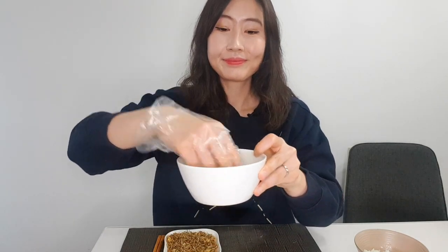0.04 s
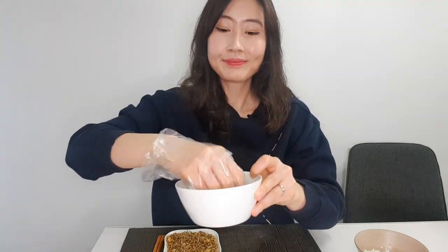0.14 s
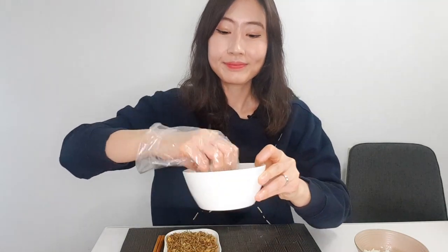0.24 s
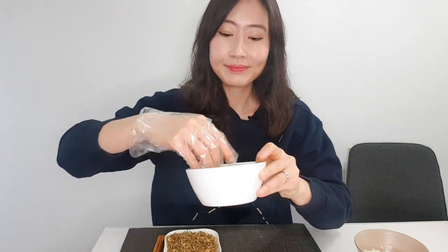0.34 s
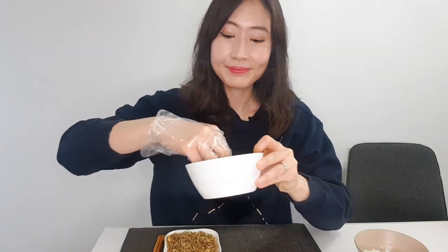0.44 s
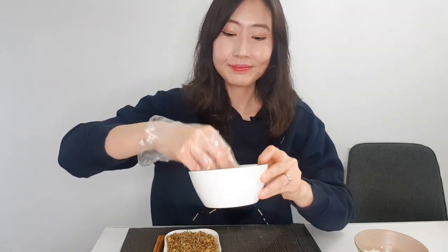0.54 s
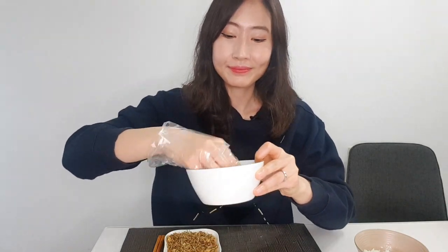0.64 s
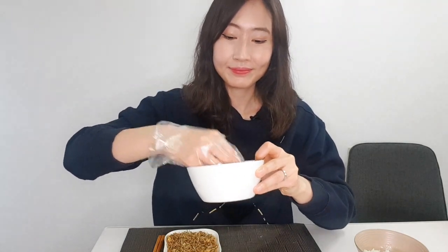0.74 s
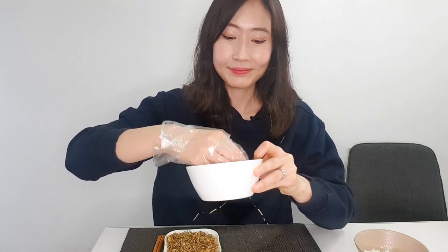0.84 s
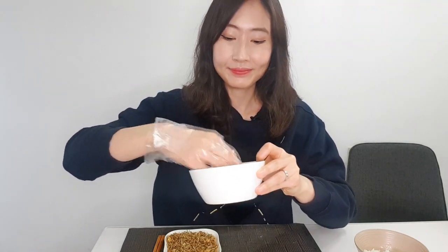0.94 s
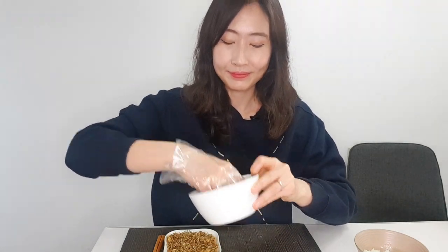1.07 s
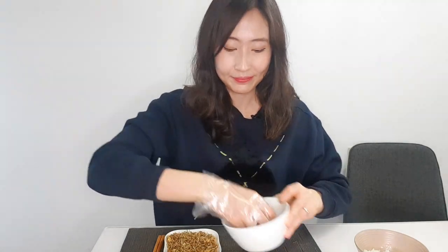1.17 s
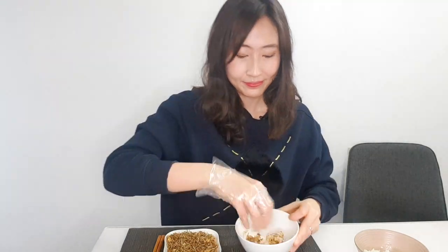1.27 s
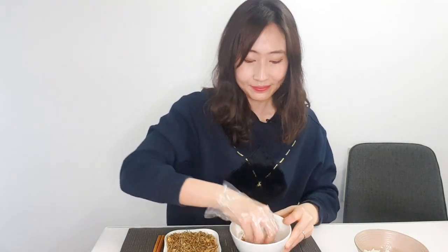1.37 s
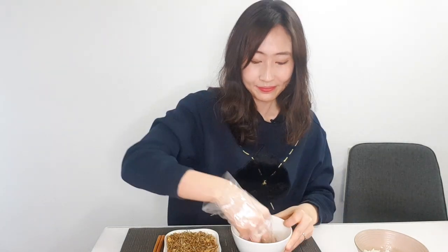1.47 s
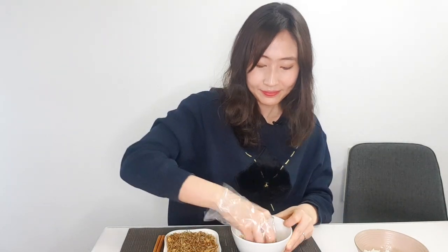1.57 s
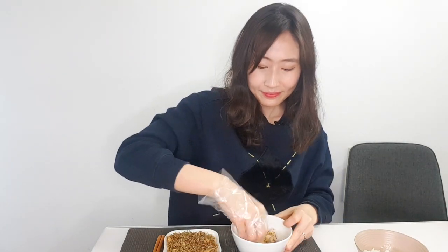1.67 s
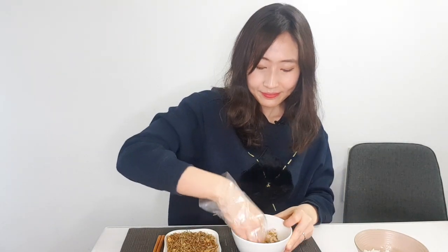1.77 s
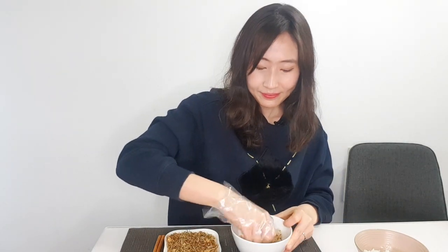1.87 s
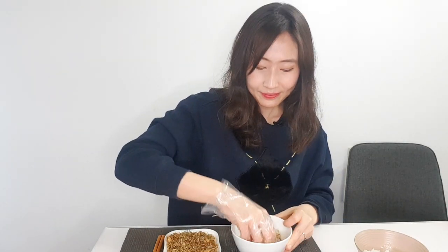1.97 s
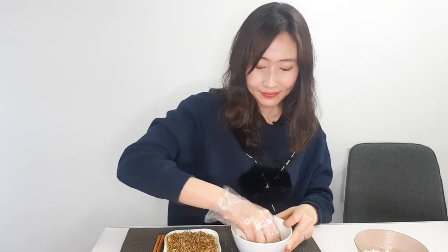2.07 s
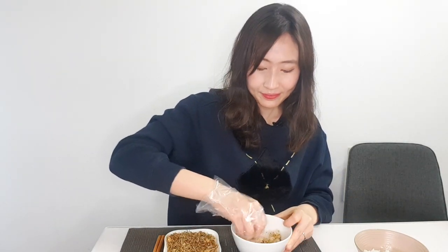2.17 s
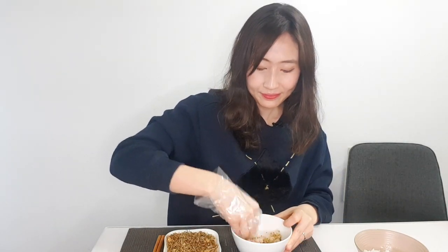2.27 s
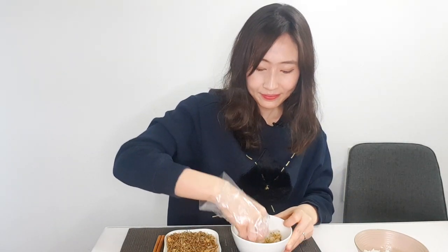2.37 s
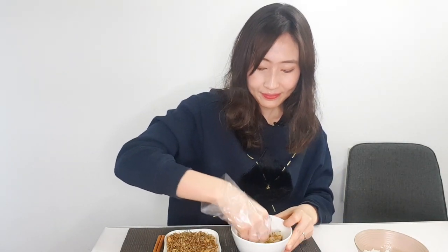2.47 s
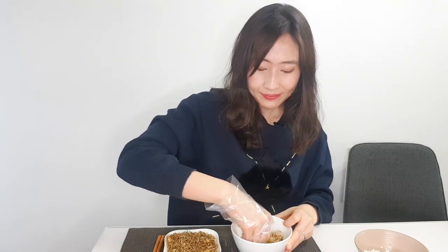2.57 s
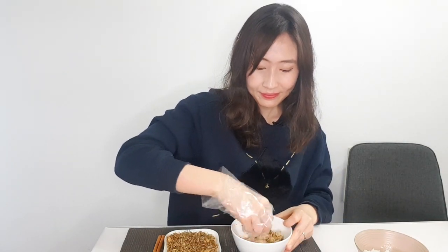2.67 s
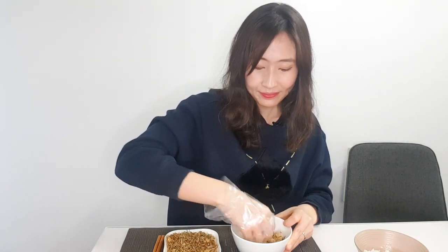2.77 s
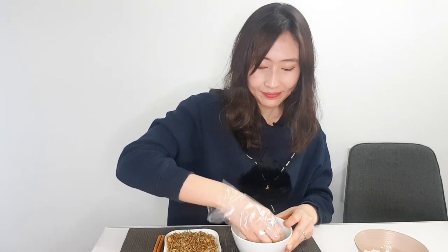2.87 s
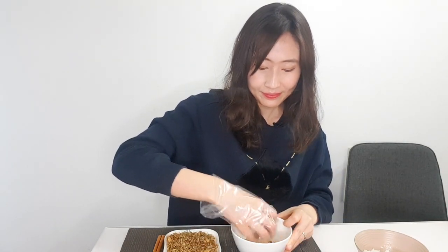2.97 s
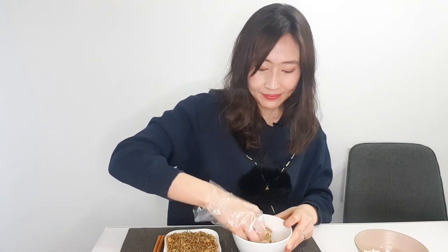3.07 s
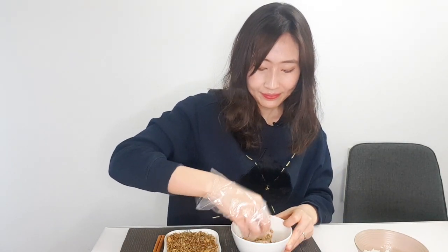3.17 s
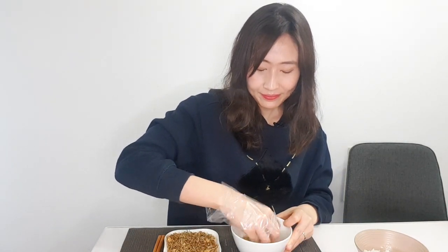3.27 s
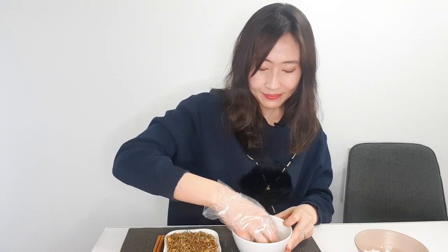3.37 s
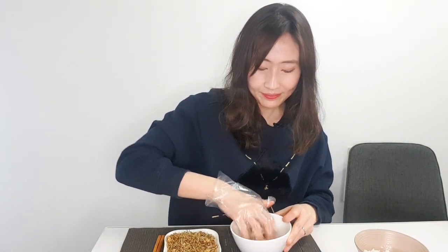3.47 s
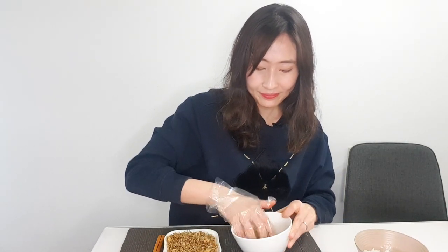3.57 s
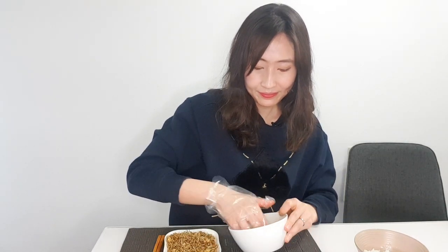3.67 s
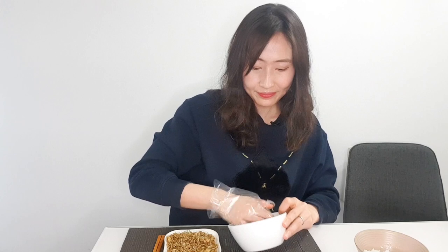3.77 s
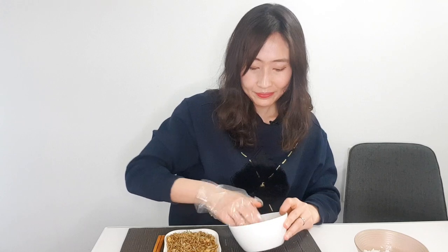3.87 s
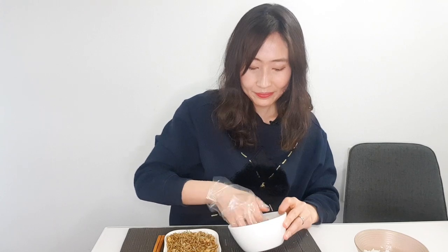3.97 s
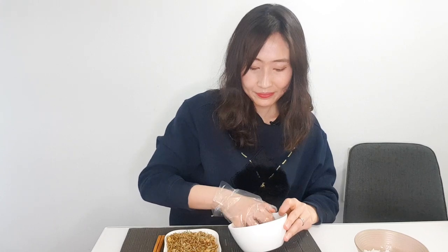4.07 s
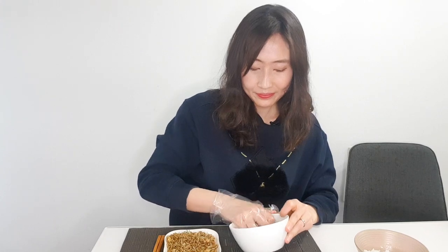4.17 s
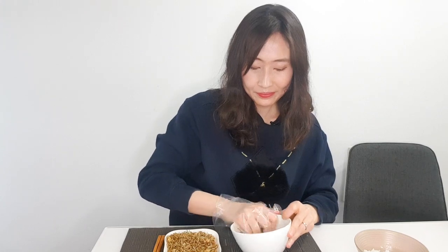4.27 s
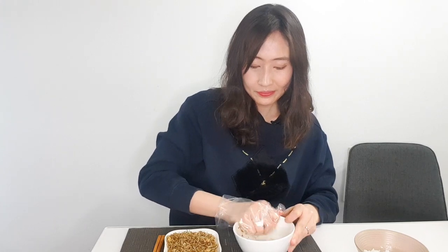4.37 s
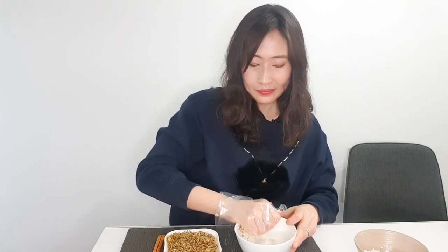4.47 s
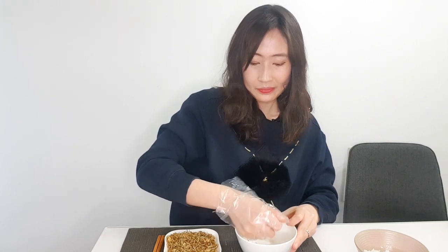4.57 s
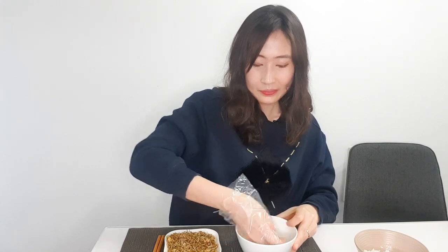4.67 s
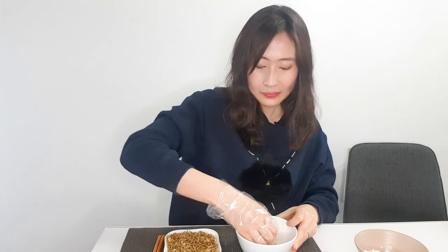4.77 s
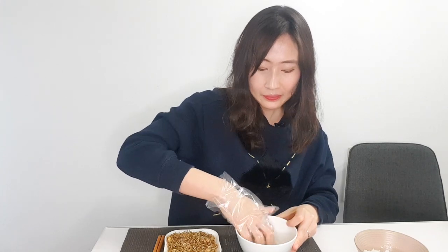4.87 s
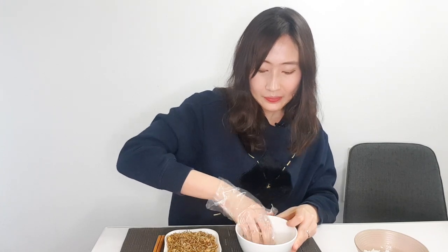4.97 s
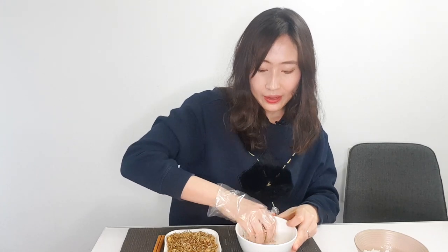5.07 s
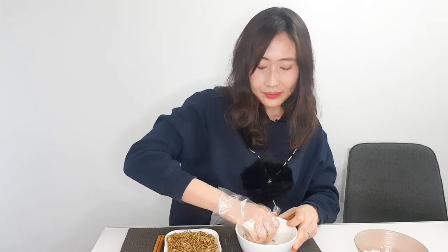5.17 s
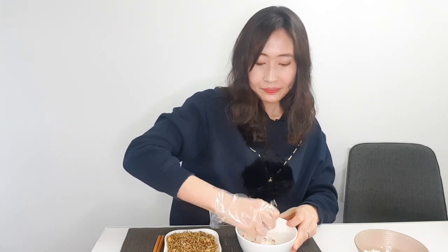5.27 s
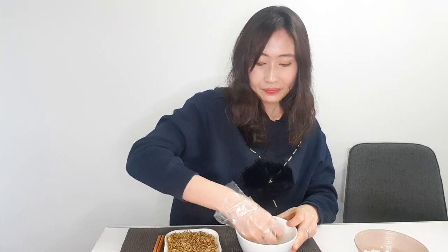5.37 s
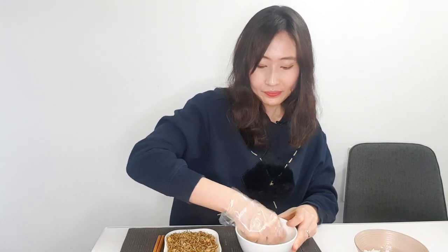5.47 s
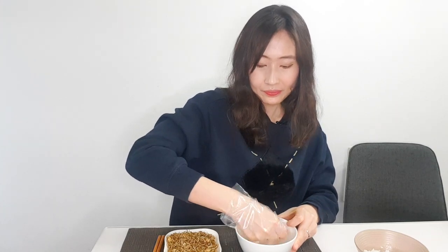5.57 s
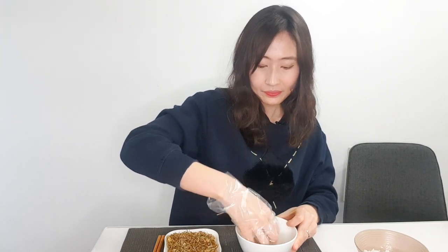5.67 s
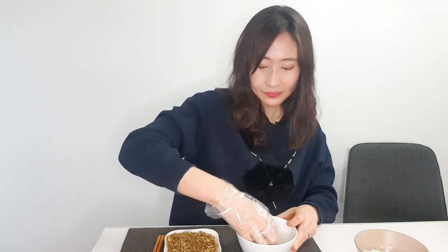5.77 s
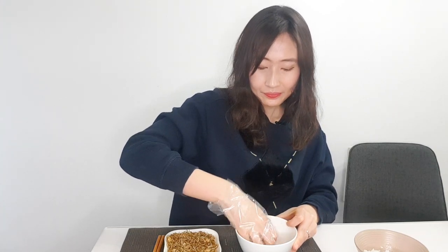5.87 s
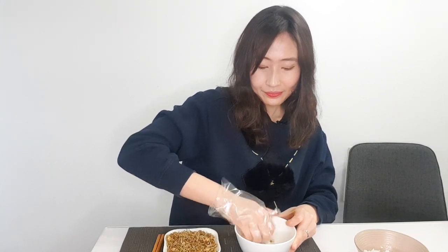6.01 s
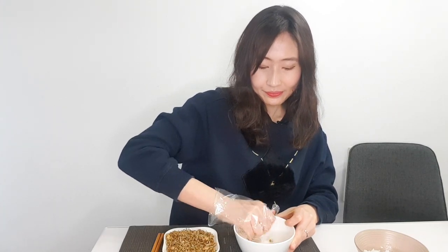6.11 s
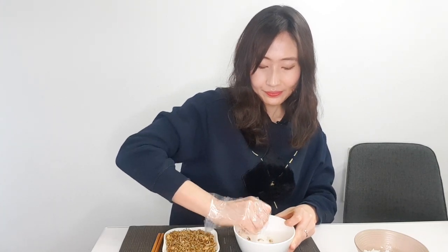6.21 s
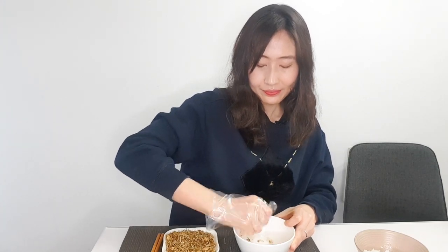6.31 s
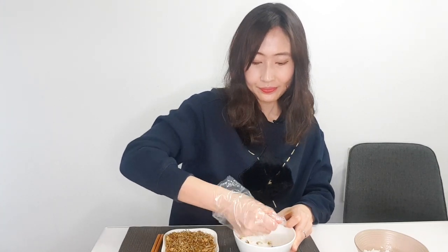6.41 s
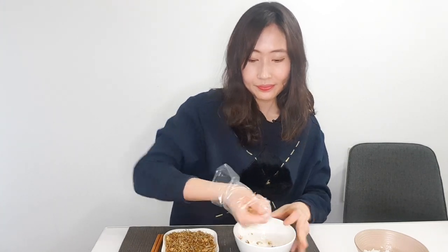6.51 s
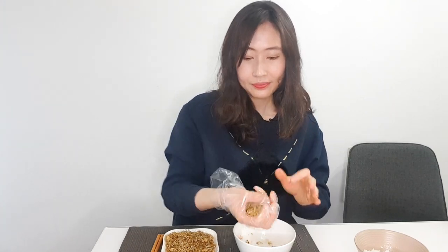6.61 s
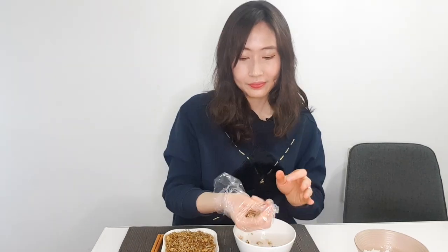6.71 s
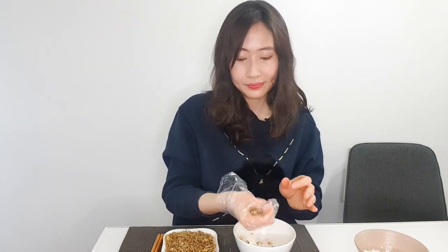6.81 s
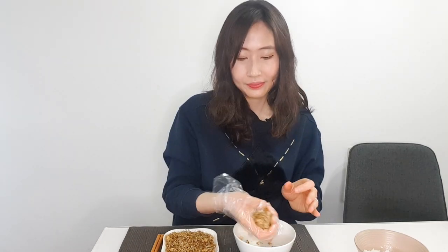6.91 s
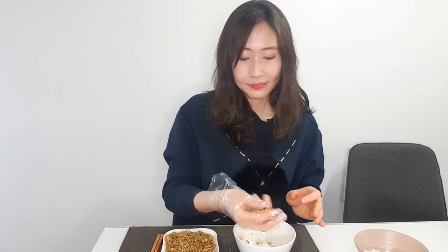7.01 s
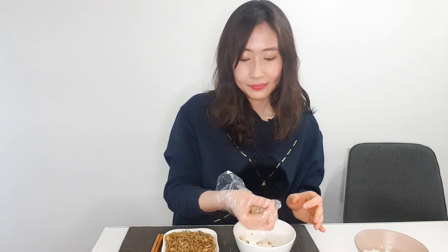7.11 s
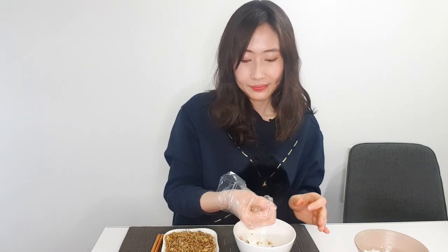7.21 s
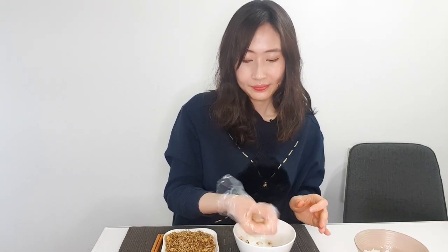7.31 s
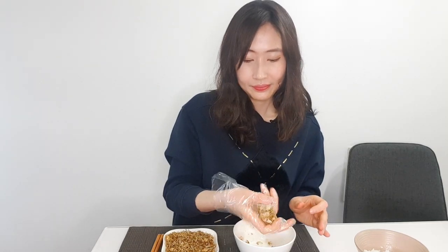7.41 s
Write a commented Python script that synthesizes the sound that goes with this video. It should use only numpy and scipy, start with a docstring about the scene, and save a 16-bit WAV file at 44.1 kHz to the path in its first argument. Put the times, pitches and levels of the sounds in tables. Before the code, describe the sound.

Crisp plastic-glove rustling over soft rice rubbing, with one hard ceramic bowl clunk and later faint knocks in a small quiet room.

```python
"""Gloved hand kneading rice

A small, faintly humming room with bare walls; one close microphone, the same in both channels.
A thin plastic glove crinkles (filtered random clicks) and snaps (short noise bursts) over a ceramic bowl.
Rice rubs along the bowl's wall (dense soft clicks) and bumps dully under the palm (low decaying sines).
The bowl, held in the air at first, is set down on the table, then rocks and knocks (ringing modes and
noise); a finger creaks off its rim (filtered pulses)."""
import sys
import numpy as np
from scipy import signal
from scipy.fft import rfft, irfft, next_fast_len
from scipy.io import wavfile
from scipy.ndimage import uniform_filter1d, map_coordinates

SR = 44100
rng = np.random.default_rng(int(sys.argv[2]) if len(sys.argv) > 2 else 0)


def master(y):
    """Save y as 16-bit WAV."""
    cut = np.clip(np.atleast_2d(y).T, -1, 1)
    pcm = np.round(cut * 32767)  # scale
    wavfile.write(sys.argv[1], SR, pcm.astype(np.int16))


N = 328545


def amp(db):
    """Decibels to gain."""
    return 10 ** (np.asarray(db) / 20)


def unit(x):
    """x at rms 1."""
    return x / np.sqrt(np.mean(x ** 2) + 1e-20)


def along(points, hz):
    """(f/Hz, value) points read on a log frequency axis."""
    f, value = np.transpose(points)
    return np.interp(np.log(hz + 1), np.log(f), value)


def curves(rows):
    """One value per sample for each column after the time."""
    s, *columns = np.transpose(rows)
    return [np.interp(np.arange(N) / SR, s, column) for column in columns]


def wobble(rate):
    """Random values, rate a second, joined by straight lines."""
    return map_coordinates(rng.standard_normal(N // 20), [np.arange(N) * rate / SR], order=1)


def coloured(x, gain_db):
    """x through a causal minimum-phase filter whose gain in dB is a function of frequency."""
    m = 2 * next_fast_len(len(x) // 2 + 2048)
    cepstrum = irfft(np.log(amp(gain_db(np.fft.rfftfreq(m, 1 / SR)))))
    # folding the cepstrum onto positive times makes the filter causal
    cepstrum[1:m // 2] *= 2
    cepstrum[m // 2 + 1:] = 0
    response = np.exp(rfft(cepstrum))
    return irfft(rfft(x, m) * response)[:len(x)]


def shaped(x, spectrum):
    """x through a filter given as (f/Hz, level/dB) points."""
    return coloured(x, lambda hz: along(spectrum, hz))


def fade(t, t60):
    """Exponential decay, 60 dB down after t60 seconds."""
    return np.exp(-np.log(1000) * t / t60)


def add(track, s, sound):
    """Mix a sound into the track at time s."""
    part = track[max(round(s * SR), 0):][:len(sound)]
    part += sound[:len(part)]


def crackle(rate, scatter_db, clump_db, clump_rate, t60):
    """Tiny buckling clicks, rate a second, in avalanches; each has its own size and its own brief rattle."""
    at = np.flatnonzero(rng.random(N) < rate / SR)
    clumps = clump_db * wobble(clump_rate)
    scatter = scatter_db * np.minimum(rng.standard_normal(N), 2.5)  # no click stands out too far
    sizes = amp(scatter + clumps)[at]
    k = np.arange(SR // 700)
    clicks = sizes[:, None] * rng.standard_normal((len(at), len(k))) * fade(k / SR, t60)
    return np.bincount((at[:, None] + k).ravel(), clicks.ravel(), N + len(k))[:N]


def even(x):
    """x at nearly the same mean strength from moment to moment, single clicks kept."""
    power = uniform_filter1d(uniform_filter1d(x ** 2, size=1700), size=700)
    return x / np.sqrt(np.abs(power) + 1e-12)


def stroke(length, attack, sag_db, t60):
    """Strength of one hand movement: it swells, sags while it lasts, then dies away."""
    age = np.arange(int((length + t60) * SR)) / SR
    rise = np.sin(np.pi / 2 * np.minimum(age / attack, 1)) ** 2
    sag = amp(sag_db * (.5 - np.minimum(age / length, 1)))
    return rise * sag * fade(np.maximum(age - length, 0), t60)


def effort(strokes, idle_db, attack, sag_db, t60):
    """Gain over time of (start, length, dB) movements, added in power to the idle level."""
    power = np.full(N, amp(idle_db) ** 2)
    for start, length, db in strokes:
        add(power, start, (amp(db) * stroke(length, attack, sag_db, t60)) ** 2)
    return np.sqrt(power)


# colour of the room's drone: [f/Hz, relative level/dB]
HUM_SPECTRUM = [(20, -27), (40, -32), (55, -13), (85, -21.5), (118, -0.5), (150, 1.5), (200, -8.5),
                (290, -13.5), (400, -15.5), (1000, -32), (3000, -14), (8000, -49.5), (16000, -42)]


def hum(level_db=-69, drift_db=2.88):
    """The room drones faintly in its low resonances: filtered noise that swells and sinks."""
    swell_db, = curves([(0, 1.452), (1.3, 1.228), (2, -1.195), (4, 1.83), (7.45, -1.945)])
    drone = unit(shaped(rng.standard_normal(N), HUM_SPECTRUM))
    return amp(level_db + swell_db + drift_db * wobble(12)) * drone


# how long the room rings on: [f/Hz, t60/s]
ROOM_DECAY = [(150, 0.252), (1000, 0.2056), (4000, 0.087), (14000, 0.068)]


def room(x, wet_db):
    """x with the short answer of bare walls: noise dying at a different speed in each band."""
    hz, t, bands = signal.stft(rng.standard_normal(SR // 2), SR, nperseg=256)
    tail = signal.istft(bands * fade(t, along(ROOM_DECAY, hz)[:, None]), SR, nperseg=256)[1]
    tail = np.pad(tail / np.linalg.norm(tail), (SR // 300, 0))  # walls answer after about 3 ms
    return x + amp(wet_db) * signal.fftconvolve(x, tail)[:N]


# the palm presses into the bowl: [t/s, level/dB of a 0 dB mode]
PALM_PRESSES = [(0.201, -57), (1.722, -55.5), (1.894, -52.5), (2.15, -57), (2.44, -59.5), (2.756, -55.5),
                (2.83, -57.5), (3.119, -59), (3.719, -57.5), (3.942, -55.5), (5.082, -56), (5.74, -59),
                (6.49, -58.5), (7.048, -58)]


def presses(t60=0.197, rise_s=0.00614):
    """A push of the palm into the rice gives a dull, low bump of three decaying sines."""
    out, t = np.zeros(N), np.arange(SR // 3) / SR
    for s, db in PALM_PRESSES:
        sway = sum(amp(mode_db) * np.sin(2 * np.pi * (hz * t + rng.random()))
                   for hz, mode_db in [(120, -1.0), (149, 1), (195, -3.5)])
        add(out, s, amp(db) * sway * fade(t, t60) * (1 - np.exp(-t / rise_s)))
    return out


# a fingertip lets go of the glaze in jerks: [t/s, dry peak level/dB, treble edge f/Hz]
FINGER_SLIPS = [(6.6514, -34.5, 2406), (6.6587, -35, 2869), (6.6624, -33, 3287), (6.6671, -41.5, 3275),
                (6.6716, -45, 3072)]


def creak(ring_db=-26, ring_t60=0.0134):
    """Each slip is one dry, rounded pulse with a trace of ring."""
    out, t = np.zeros(N), np.arange(SR // 25) / SR
    for s, db, edge_hz in FINGER_SLIPS:
        jerk = (t == 0) + amp(ring_db) * rng.standard_normal(len(t)) * fade(t, ring_t60)

        def rounding(f):
            treble_cut = 1 + np.minimum(f / edge_hz, 2) ** 12  # no further loss above twice the edge
            bass_cut = 1 + (200 / (f + 10)) ** 4
            return -10 * np.log10(treble_cut * bass_cut)

        pulse = coloured(jerk, rounding)
        add(out, s, amp(db) * pulse / np.abs(pulse).max())
    return out


# the bowl meets the table: [t/s, blow level/dB, contact hardness f/Hz, table thump level/dB,
# share of the full ring length]
BOWL_KNOCKS = [(1.396, -20, 2200, -0.5, 0.74), (1.437, -25.5, 1211, 0, 0.321),
               (1.894, -40.5, 3012, -7.5, 0.907), (2.262, -52.5, 2001, -10.5, 0.69),
               (2.570, -49.5, 2600, -7.5, 0.587), (2.632, -52, 2388, -15.5, 0.503),
               (2.757, -41.5, 2797, -4, 0.983), (3.416, -46.5, 1101, 5.5, 0.82),
               (5.600, -39.5, 1080, 4.5, 0.822)]
# bowl on table, the short modes are the clack of its foot: [f/Hz, relative level/dB, free t60/s]
BOWL_MODES = [(195, -7.5, 0.092), (316.3, -3.5, 0.099), (368.9, -1, 0.1013), (629.7, -5, 0.1444),
              (730.7, -0.5, 0.0565), (735.5, -5, 0.201), (935.2, -22.5, 0.245), (1002.3, -9.5, 0.425),
              (1135, -6, 0.127), (1316.7, 5.5, 0.065), (1445.4, 4, 0.157), (1475, 4, 0.078),
              (1620.6, 5.5, 0.0445), (1676.7, 4, 0.102), (1898, 14.5, 0.0267), (1952, -8, 0.14),
              (2157, -11.5, 0.079), (2200, 0.5, 0.059), (2506, -31, .05), (2640, -31.5, .1),
              (2936, 2, 0.065), (3260, -15.5, .08), (4320, -31.5, 0.1)]
# colour of the struck table: [f/Hz, relative level/dB per Hz]
TABLE_SPECTRUM = [(40, -10), (80, -25.5), (110, -6), (170, -2), (340, -3), (450, -4.5), (680, 4.5),
                  (950, 3.5), (1500, -2.5), (2000, 1.5), (2600, -1.5), (3500, -6), (6000, -7), (15000, -11)]


def bowl(clack_db=-5, clack_t60=0.0966, rattle_db=-12, rattle_t60=0.33, thump_hz=750):
    """Each knock rings bowl and table; a soft contact loses the treble, a flat one thumps, the hand damps."""
    out, t = np.zeros(N), np.arange(SR // 2) / SR
    hz, mode_db, t60 = np.transpose(BOWL_MODES)[:, :, None]  # one row per mode
    for s, db, hard_hz, thump_db, free in BOWL_KNOCKS:
        age = t / max(free, .1)  # a damped ring ages faster
        strengths = amp(mode_db + rng.standard_normal(hz.shape))  # no two blows land alike
        phases = .5 * rng.random(hz.shape)  # all modes start within half a cycle
        modes = strengths * np.sin(2 * np.pi * (hz * t + phases)) * fade(age, t60)
        ring = np.sum(modes, axis=0) / np.linalg.norm(strengths)
        dying = amp(clack_db) * fade(age, clack_t60) + amp(rattle_db) * fade(age, rattle_t60)
        force = amp(0.0576 * (db - BOWL_KNOCKS[0][1]))  # a light tap shakes the table a little less
        # noise stands for the table's many crowded modes
        clack = force * dying * unit(shaped(rng.standard_normal(len(t)), TABLE_SPECTRUM))

        def contact(f):
            thump = thump_db / (1 + (f / thump_hz) ** 4)
            treble_cut = 1 + (f / hard_hz) ** 4
            bass_cut = 1 + (110 / (f + 10)) ** 4
            return thump - 10 * np.log10(treble_cut * bass_cut)

        onset = 1 - np.exp(-t / 0.0007)
        add(out, s, amp(db) * coloured((2.52 * ring + clack) * onset, contact))
    return out


# strokes that push rice along the bowl's wall: [start t/s, length t/s, level/dB before the rice gain]
RICE_SMEARS = [(0.0, 0.0846, -68), (.58, 0.0435, -63.5), (.795, 0.0336, -58), (.98, 0.39, -70),
               (1.57, 0.2186, -61.5), (1.93, 0.12, -71.5), (2.34, 0.1507, -65), (2.55, 0.0579, -74.5),
               (2.86, 0.0904, -63.5), (3.05, 0.17, -65), (3.39, 0.1884, -64), (3.67, 0.2784, -67),
               (4.35, 0.0826, -67.5), (4.42, 0.08, -62), (4.94, 0.202, -62.5), (5.33, 0.0887, -74),
               (5.84, 0.119, -63), (6.32, 0.0662, -64.5), (6.92, 0.18, -66), (7.34, .06, -64.5)]
# colour of the hollow rub: [f/Hz, relative level/dB]
RICE_SPECTRUM = [(100, -32), (250, 0.5), (480, -5), (750, 2.5), (1150, 1.5), (1600, -1), (2500, -16.5),
                 (4800, -21), (6200, -5.5), (8000, -23.5)]


def rice(level_db=1, idle_db=-75.5, attack_s=0.0348, sag_db=0.5, t60=0.148):
    """Sticky grains slip along the bowl's wall, so many that they merge into a soft, hollow rub."""
    # the rub swells in, eases slightly while the stroke lasts, then dies away;
    # loose grains shift between strokes
    push = effort(RICE_SMEARS, idle_db, attack_s, sag_db, t60)
    slips = crackle(2500, scatter_db=2, clump_db=1.5, clump_rate=60, t60=.002)
    return amp(level_db) * push * even(shaped(slips, RICE_SPECTRUM))


# the largest folds of the glove that snap through: [t/s, level/dB before the snap gain, treble share 0-1]
FOLD_SNAPS = [(0.018, -39, 0.74), (.235, -40.5, 0.75), (0.416, -38, 0.83), (0.4876, -42.5, 0.78),
              (.576, -42.5, 0.46), (0.6627, -31, 0.9), (0.7958, -46, 0.73), (0.8933, -36, 0.69),
              (1.0326, -33, 0.56), (1.06, -31.5, 0.92), (1.119, -40.5, 0.83), (1.716, -43.5, 0.61),
              (1.99, -39.5, 0.55), (2.3171, -43, 0.72), (2.6341, -47.5, 0.84), (2.8627, -41.5, 0.41),
              (3.105, -39, 0.83), (3.734, -41.5, 0.94), (3.8297, -42.5, 0.65), (3.8687, -40, 0.96),
              (4.0242, -40, .95), (4.2362, -47, 0.01), (4.2745, -38.5, .97), (4.774, -59, .2),
              (4.9359, -41, 0.94), (5.0443, -43.5, 0.98), (5.1522, -42, .95), (6.021, -43.5, 0.39),
              (6.0533, -40, 0.81), (6.0843, -39, 0.06), (6.158, -41.5, .95), (6.2106, -42, 0.97),
              (6.321, -46.5, 0.91), (6.43, -47, 0.64), (7.2432, -48.5, 0.63)]
# colours of slack folds, rice peeling off the film and tight creases: [f/Hz, relative level/dB]
FOLD_SPECTRUM = [(100, -46.5), (350, -17), (800, -13.5), (1300, -5.5), (1700, -2), (2000, -1), (2450, 3),
                 (3100, 4), (3800, -2), (5000, 1), (7000, -11), (9000, -27.5), (16000, -82)]
STICKY_SPECTRUM = [(300, -56), (1500, -25.5), (3000, 1.5), (3900, -1), (4600, 5), (5200, 3), (6100, -0.5),
                   (7300, 0), (8900, -11), (11000, -20.5), (16000, -24.5)]
CREASE_SPECTRUM = [(1000, -62), (5000, -19.5), (8000, -7.5), (9000, -10.5), (10000, -6.5), (11500, -4),
                   (13000, 0), (13800, 1), (14600, -1.5), (16000, -0.5)]


def snaps(level_db=2, snap_t60=.0065, shiver_db=-22, shiver_t60=0.015):
    """A larger fold flips with one sharp tick and leaves the film shivering."""
    out, t = np.zeros(N), np.arange(SR // 20) / SR
    for s, db, treble in FOLD_SNAPS:
        tick = rng.standard_normal(len(t))
        bright = unit(shaped(tick, CREASE_SPECTRUM))
        dull = unit(shaped(tick, FOLD_SPECTRUM) + shaped(tick, STICKY_SPECTRUM))
        snap = np.sqrt(treble) * bright + np.sqrt(1 - treble) * dull
        dying = fade(t, snap_t60) + amp(shiver_db) * fade(t, shiver_t60)
        add(out, s, amp(db + level_db) * snap * dying)
    return out


# the fingers stop between squeezes and the film falls quiet: [start t/s, length t/s, drop level/dB]
FINGER_RESTS = [(.14, 0.0339, 4.5), (0.467, 0.0228, 6.5), (0.527, 0.0306, 7.5), (0.746, 0.0509, 5),
                (.858, 0.0259, 8), (1.19, 0.0351, 5.5), (1.332, 0.0514, 3), (2.64, 0.0151, 9),
                (2.705, 0.0341, 8.5), (2.82, 0.0197, 0.5), (3.236, 0.0221, 11.5), (3.314, .02, 4),
                (4.48, 0.064, 7.5), (5.563, 0.01617, 0), (6.44, 0.0947, 11), (6.855, 0.0445, 7),
                (7.29, 0.0343, 4)]


def stillness(edge_s=0.01335):
    """Gain of the glove: 1 while the fingers move, lower while they rest; edge_s is how fast they stop."""
    t = np.arange(N) / SR
    drop_db = np.zeros(N)
    for s, length, drop in FINGER_RESTS:
        drop_db += drop * np.interp(t, [s - edge_s, s, s + length, s + length + edge_s], [0, 1, 1, 0])
    return amp(-drop_db)


def flexed(x, patchy_db, size=5):
    """Folds of ever new size ring at ever new pitches: the colour shifts in brief patches."""
    z = signal.stft(x, nperseg=256)[2]
    field = rng.standard_normal(z.shape)
    for _ in range(2):
        field = uniform_filter1d(field, size, axis=0)
        field = uniform_filter1d(field, 2 * size, axis=1)
    return signal.istft(z * amp(patchy_db * unit(field)), nperseg=256)[1][:N]


# squeezes of the gloved fingers, bowl in the air, then on the table, last a handful pressed into a ball:
# [start t/s, length t/s, tight creases level/dB, slack folds level/dB over creases,
# sticky rice level/dB over creases]
GLOVE_SQUEEZES = [ (0.0, 0.098, -57, -2.5, -3), (0.182, 0.0812, -58, -3.5, -6),
                  (0.264, 0.1097, -53, -2.5, -4), (0.401, 0.032, -51, -2, -6), (0.492, 0.024, -59, -1, -1),
                  (0.559, .145, -57, 2, -2), (0.604, .055, -52, 1, -3), (0.796, 0.0464, -53, 1.5, 0),
                  (0.881, 0.0283, -49, -1.5, -8), (.925, .03, -56, 1, -4), (0.989, 0.0653, -51, 1.5, -3),
                  (1.075, 0.10044, -59, -8, -8), (1.227, 0.054, -54, -0.5, -3),
                  (1.385, 0.0667, -53, -2.5, -8), (1.477, 0.0442, -54, -0.5, 0),
                  (1.575, 0.0349, -50, 0.5, 0), (1.631, 0.2723, -55, -3.5, -1),
                  (1.968, 0.0592, -54, -0.5, -3), (2.044, 0.1285, -59, -2, -2),
                  (2.208, 0.0392, -55, -3.5, -1), (2.306, 0.0327, -53, -1.5, 0),
                  (2.38, 0.119, -60, -5.5, 1), (2.548, 0.0494, -59, -2, 0), (2.654, 0.0319, -56, 1.5, 0),
                  (2.736, 0.0226, -55, 3.5, 0), (2.844, 0.0997, -56, -0.5, -3), (3.054, 0.0705, -60, 0, 0),
                  (3.152, 0.038, -56, 0, 0), (3.261, .04, -59, -0.5, 0), (3.345, .04, -60, 1.5, -1),
                  (3.382, .075, -53.5, 2, 0), (3.454, .035, -55, 6, 2), (3.529, 0.1202, -57, -0.5, -2),
                  (3.666, .08, -56, 1, -4), (3.784, .19, -54, 0.5, -2), (4.017, .17, -56, 2.5, -2),
                  (4.28, .14, -62, -1, -4), (4.539, .11, -60.5, 1.5, -4), (4.663, 0.1496, -55, -1.5, -1),
                  (4.84, .07, -54, 3.5, -1), (4.926, 0.2397, -58, -1, -1), (5.164, 0.2116, -60, -1, -3),
                  (5.377, .15, -58, 1.5, -1), (5.578, 0.167, -55, -0.5, -2), (5.816, 0.171, -58, 2.5, 0),
                  (5.865, .032, -53, -0.5, 0), (6.008, 0.0722, -53, 2.5, 1), (6.155, 0.084, -56, 0.5, -3),
                  (6.26, 0.1414, -57, -2.5, -3), (6.554, .08, -52, -6, -4), (6.643, 0.1945, -57, -5.5, -6),
                  (6.901, 0.19, -55, -1.5, -3), (7.109, 0.122, -58, -10, -3),
                  (7.241, 0.044, -56.5, -21, -10), (7.339, 0.0526, -46.5, -4, -3),
                  (7.396, 0.057, -55.5, -4.5, -4)]
# the glove between squeezes: [creases level/dB, folds level/dB, sticky rice level/dB]
GLOVE_IDLE = (-61.5, -64.5, -65)


def glove(attack_s=.02, sag_db=2, t60=.15, surge_db=1.5, pops_db=-8):
    """Faster flexing buckles more film: slack folds rustle, rice peels off, tight creases tick very high."""
    start, length, db, slack_db, rice_db = np.transpose(GLOVE_SQUEEZES)
    # the grip closes, eases while it holds, lets go
    tight, slack, peeling = [effort(zip(start, length, level), idle, attack_s, sag_db, t60)
                             for level, idle in zip([db, db + slack_db, db + rice_db], GLOVE_IDLE)]
    rate = 2200 * (peeling / np.median(peeling)) ** .4  # clicks a second
    shared = unit(crackle(rate, scatter_db=4.0, clump_db=2.5, clump_rate=210, t60=0.00187))
    flaps = unit(crackle(rate / 2, scatter_db=4.0, clump_db=3, clump_rate=100, t60=0.00833))
    peels = unit(crackle(rate / 2, scatter_db=1.5, clump_db=8, clump_rate=88, t60=0.00215))
    ticks = unit(crackle(rate / 2, scatter_db=5.5, clump_db=4, clump_rate=100, t60=.0012))
    pops = amp(pops_db) * unit(crackle(70, scatter_db=3, clump_db=1, clump_rate=30, t60=.0015))
    folds = slack * even(shaped(shared + 0.738 * flaps + pops, FOLD_SPECTRUM))
    sticky = peeling * even(shaped(shared + 0.5424 * peels + pops, STICKY_SPECTRUM))
    creases = tight * even(shaped(shared + 0.67 * ticks + 1.45 * pops, CREASE_SPECTRUM))
    surges = amp(surge_db * wobble(40))  # the fingers move in small jerks
    return stillness() * surges * flexed(folds + sticky + creases, patchy_db=2.2)


# colour of the glove while the bowl is held in the air: [f/Hz, level/dB]
LIFTED_SPECTRUM = [(900, 2.5), (1700, -2.5), (2450, 4), (3200, -3.5), (4500, -1), (5700, 3), (7600, -9),
                   (8300, -4), (9400, 2.5), (10600, 3.5), (12000, 1), (14500, 0)]


def lowered(film):
    """The glove's colour crossfades as the bowl is lowered from the air to the table."""
    lifted, = curves([(1.1, 0.953), (1.4, 0.017)])
    return lifted * shaped(film, LIFTED_SPECTRUM) + (1 - lifted) * film


def scene():
    """Everything reaches one microphone, the same in both channels."""
    film = room(lowered(glove() + snaps()), wet_db=-14.5)
    ceramic = room(bowl() + creak(), wet_db=-10.5)
    mono = hum() + presses() + ceramic + rice() + film
    return np.array([mono, mono])


def record(dry, top_hz=15800):
    """The recorder keeps nothing above its band limit."""
    m = next_fast_len(N + SR // 2)
    kept = np.fft.rfftfreq(m, 1 / SR) < top_hz
    return irfft(rfft(dry, m) * kept, m)[:, :N]


dry = scene()
out = record(dry)
master(out)
```